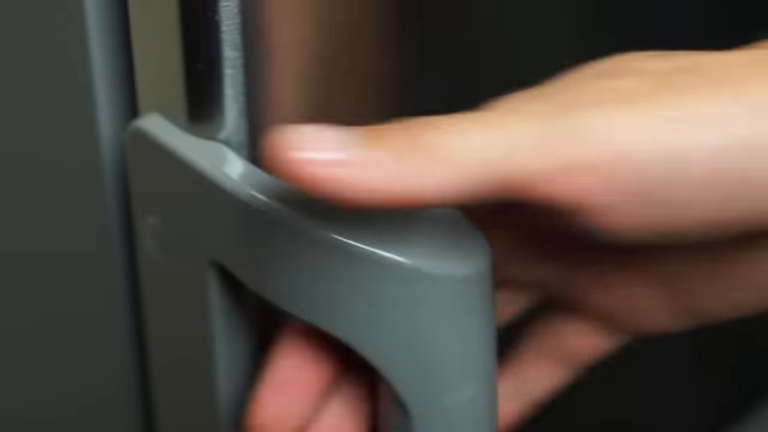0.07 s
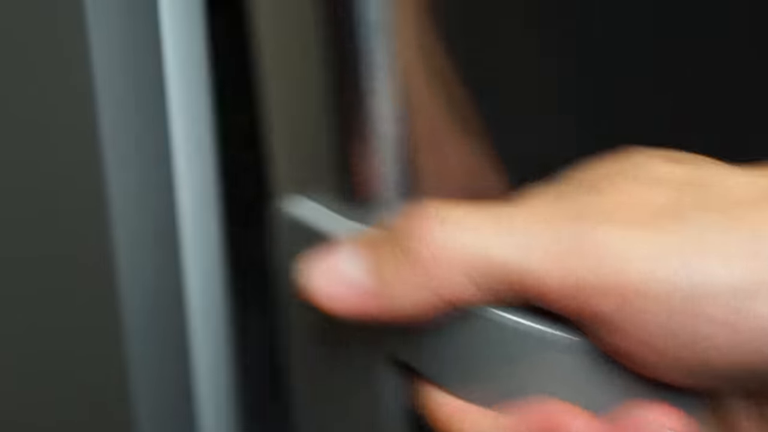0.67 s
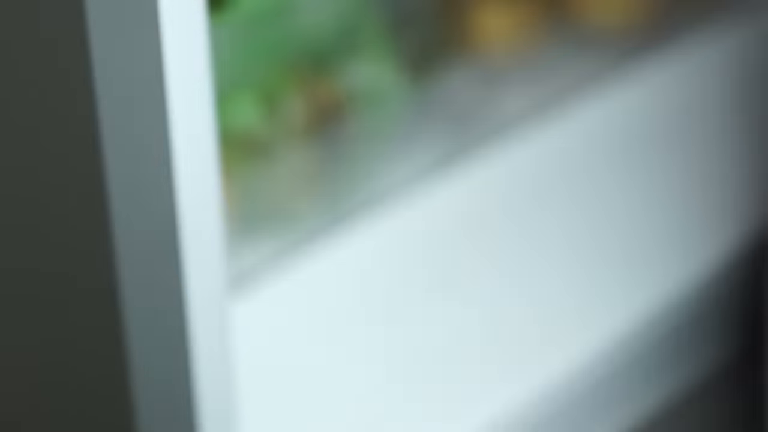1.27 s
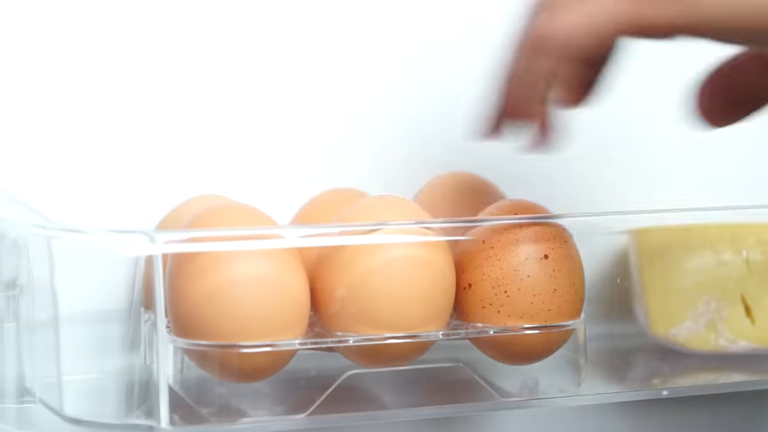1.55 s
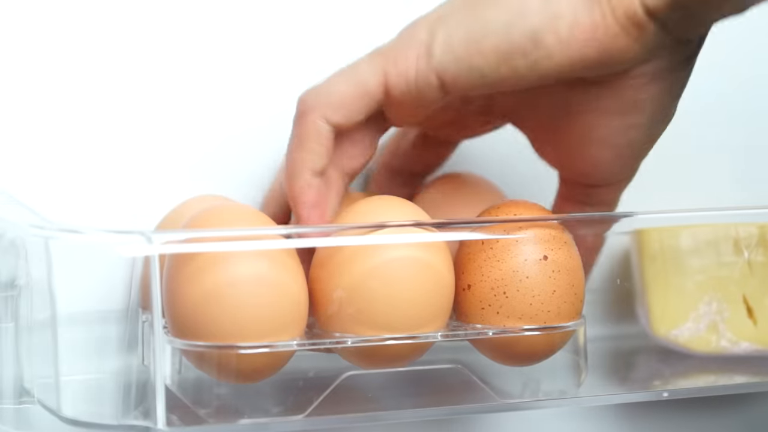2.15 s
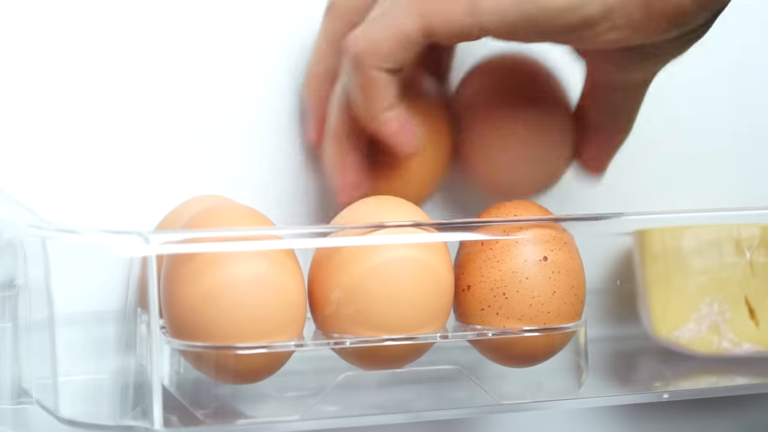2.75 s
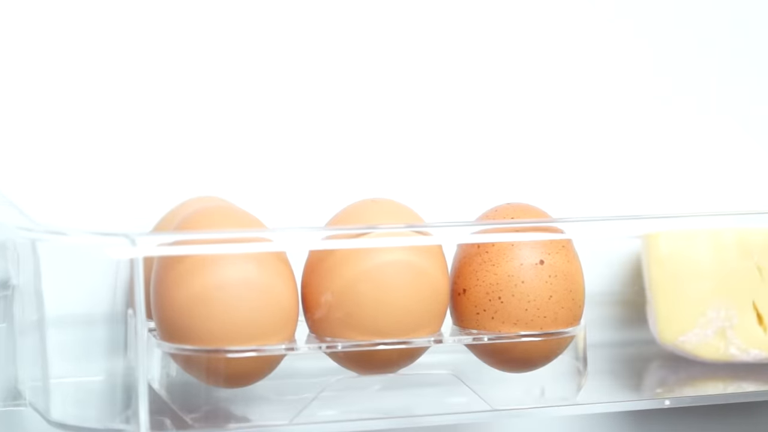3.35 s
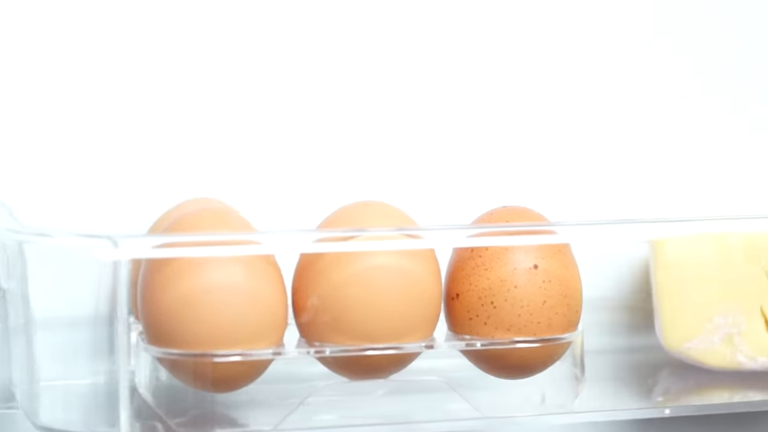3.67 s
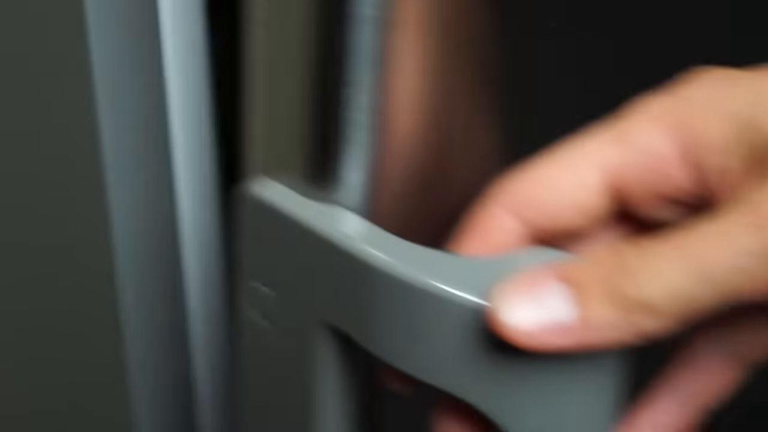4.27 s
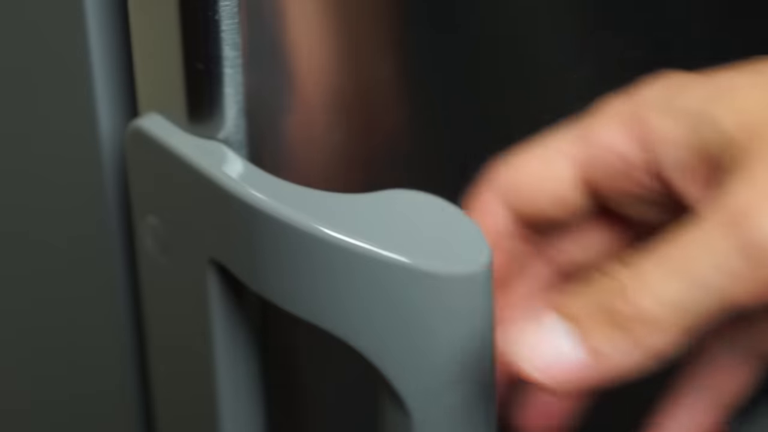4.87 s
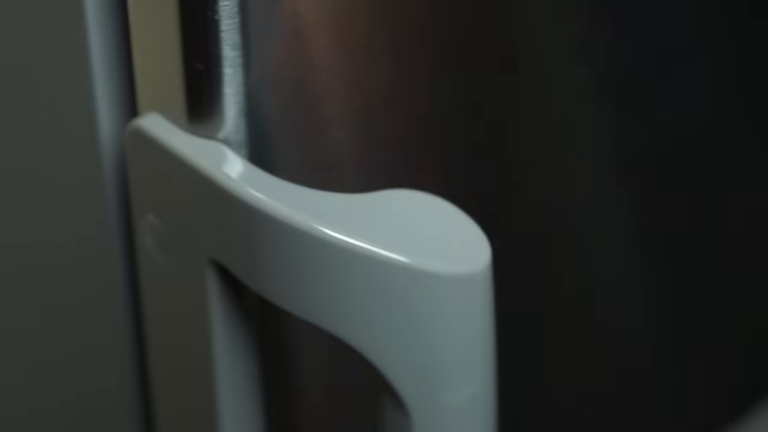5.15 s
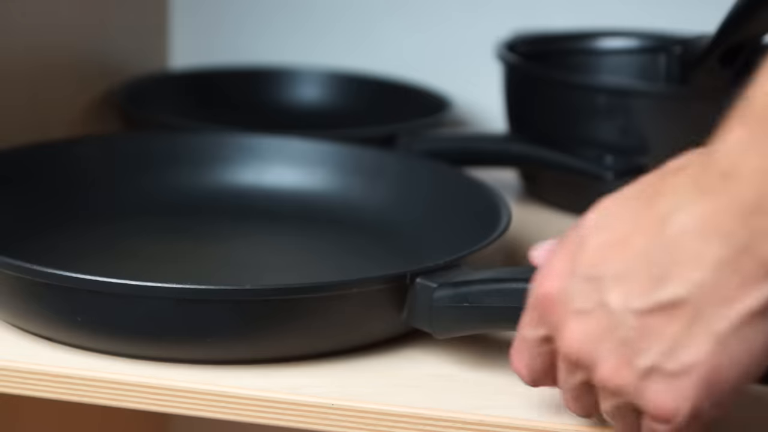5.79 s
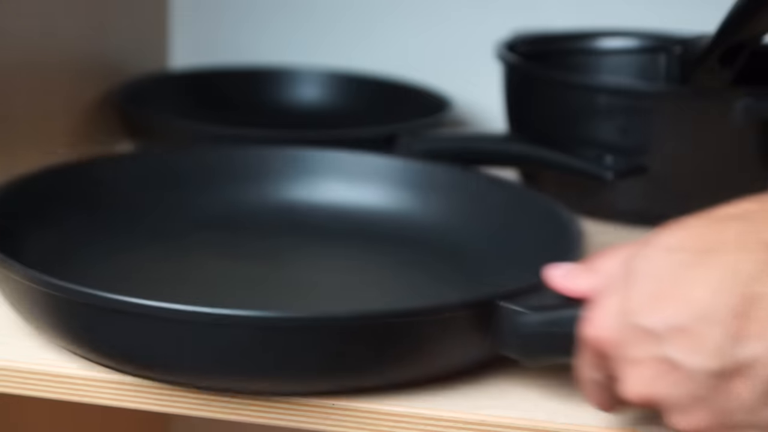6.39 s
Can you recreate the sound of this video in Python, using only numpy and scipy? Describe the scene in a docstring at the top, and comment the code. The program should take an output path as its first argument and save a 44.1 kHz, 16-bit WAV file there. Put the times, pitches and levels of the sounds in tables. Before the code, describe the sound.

Low room tone fills a slightly echoing kitchen, with the action close to the microphone. At about 0.5 seconds a fridge door is pulled open: the rubber seal rubs and snaps free in quick clicks, bottles touch lightly, and the door knocks at 0.8 seconds. From 1.4 to 3.9 seconds the open fridge whirrs faintly. Between 2.3 and 2.6 seconds eggs bump, slide and clink out of their hollow plastic cups, and a nudged glass rings on briefly. At 4.2 seconds the door rack clacks and the seal brushes; the door smacks shut near 4.5 seconds, followed by soft bumps until 5. Two soft taps on a pan handle come at 6.1 seconds, then the frying pan scrapes over a wooden shelf, growing louder and brighter until about 6.4. A faint hiss rises with each action, and the room tone dips briefly between them.

```python
"""A live kitchen, the microphone close to the fridge. The door is pulled open: its rubber seal rubs and
snaps free, bottles touch and the door knocks. The open fridge whirrs while eggs slide out of their cups,
clinking, and a nudged glass rings on. The door swings shut with a clack, a smack and soft bumps. Last,
a frying pan is dragged over a wooden shelf, its base catching on the grain. Each action comes up with
a faint hiss, over a room tone that dips briefly between them."""
import sys
import numpy as np
from scipy import signal
from scipy.fft import rfft, irfft, next_fast_len
from scipy.io import wavfile
from scipy.ndimage import uniform_filter1d

SR = 44100
rng = np.random.default_rng(int(sys.argv[2]) if len(sys.argv) > 2 else 0)


def wav_record(signal):
    """Record a signal, one row per channel, as 16-bit PCM in the file named by sys.argv[1]."""
    frames = np.transpose(np.atleast_2d(signal))
    bounded = np.clip(frames, -1, 1)
    # unit amplitude maps onto the largest positive 16-bit level
    quanta = np.round(bounded * 32767).astype(np.int16)
    wavfile.write(sys.argv[1], SR, quanta)


N = 283112
T = np.arange(N) / SR

# stretches of room tone: start_s, end_s, level_db
TONE_SPANS = [(0, 1.381, -59.5), (1.379, 3.903, -65), (3.898, 5.42, -64), (5.42, 6.6, -67)]
# spectra of the room tone, the hiss and the open fridge: frequency_hz, level_db
TONE_COLOUR = [(15, -35), (25, -9.5), (122, -12.5), (193, -3), (267, -9), (340, -6.5), (410, -8),
               (552, -5.5), (631, -11.5), (762, -3.5), (895, -12.5), (1080, -13.5), (1900, -17),
               (2230, -18), (15500, -28)]
HISS_COLOUR = [(18, -41), (30, -9), (111, -10.5), (187, 4.5), (256, -7.5), (389, -7), (532, -4),
               (622, -4.5), (767, -2), (1400, -16), (2360, -15.5), (15500, -27.5)]
WHIRR_COLOUR = [(15, -41), (25, -10.5), (96, -2.5), (193, -4), (221, -6), (289, -1.5), (359, -8.5),
                (389, 2), (457, -6), (762, -5), (997, -11.5), (1080, -10.5), (1750, -14), (5580, -20),
                (15500, -25.5)]
# stereo width of the room tone and of the close sounds: frequency_hz, side_over_mid_db
TONE_WIDTH = [(40, -16.5), (100, -10.5), (250, -2), (700, 2.5), (2500, 4), (6000, -1), (14000, -2)]
CLOSE_WIDTH = [(50, -27.5), (130, -21), (250, -11), (1000, -6.5), (3000, -4.5), (12000, -2.5)]
# fader moves, one for each action: start_s, fade_in_s, end_s, fade_out_s, hiss_db, floor_db
ACTIONS = [(0.328, .11, 1.141, 0.1, -43.5, -15), (2.19, .13, 2.738, .18, -42.5, -9),
           (4.074, 0.065, 4.99, .14, -47, -17.5), (6.029, 0.17, 6.49, .1, -52, -17.5)]

# seal and plastic trim snapping: start_s, level_db, tilt_db_per_octave, t60_s
SNAPS = [(0.4707, 3, -3.5, 0.047), (0.501, 4.5, 0, .057), (.527, 7, -1.5, .067), (0.5409, 19, 2.5, 0.024),
         (.551, 18, -4, .092), (.595, 14.5, -0.4, 0.033), (0.6, 15.5, -1.5, .07), (.668, 10, -1.6, .12),
         (.760, 1.5, 4.5, .09), (.763, 2, -8.5, 0.11), (2.398, 5.5, -1, .095), (2.545, 5.5, -1.5, .082),
         (4.2198, -1.5, 2, 0.044), (4.2233, 10.5, 2.5, 0.054), (4.358, -7, -5, .08),
         (4.453, -7.5, -4.5, 0.12), (4.4695, 18, -0.3, .05), (4.475, 19.5, 3.5, 0.015),
         (4.481, 18, -1, .08), (4.482, -6.5, 12.5, 0.054)]
# spectra of the snaps, the door panel behind them and the rubbing seal: frequency_hz, level_db
SNAP_COLOUR = [(200, 1.5), (1200, 0), (4500, -11.5), (13000, -28.5)]
PANEL_COLOUR = [(25, -20), (55, -12), (90, 0.5), (180, -2.5), (290, 5.5), (380, -2.5), (520, 5), (1050, -3),
                (1400, 2), (2200, 2), (5500, -0.5), (9500, -3.5), (15000, -2)]
RUB_COLOUR = [(24, -40.5), (40, -6.5), (119, -7), (153, -0.5), (364, -9), (443, -2.5), (643, -15),
              (765, -8), (1420, -12), (1920, -20.5), (4340, -31), (4680, -31), (15000, -41)]
# friction strokes: full_strength_at_s, hold_s, level_db
SEAL_RUBS = [(.485, 0.37, -34.5), (4.24, .19, -40.5), (4.5, 0.063, -38.5)]   # the seal peels off, brushes the frame and is pressed home
EGG_SLIDES = [(2.40, .015, -30), (2.48, 0.087, -37.5)]
# resonances of plastic trim, hollow egg cups and pan: pitch_hz, bandwidth_hz, level_db
TRIM_RESONANCES = [(1070, 20, -9), (1314, 30, -5), (1890, 35, -10.5), (6000, 830, -10)]
CUP_RESONANCES = [(126, 16, -6), (310, 53, -1.5), (437, 72, 3.5), (667, 92, 4.5), (1130, 91, -1),
                  (1780, 100, -20.5), (3323, 1700, -41)]
PAN_RESONANCES = [(855, 170, -5), (1390, 38, -5.5), (1700, 37, -0.5), (1910, 24, -2), (2390, 37, -8),
                  (2965, 22, -6), (3030, 48, -16.5), (3170, 20, -9), (3810, 28, -10), (4400, 39, -7),
                  (4900, 390, -15.5), (6000, 50, -18)]

# blows on each object: start_s, level_db, contact_cutoff_hz
BOTTLE_TOUCHES = [(.599, -1.5, 9000), (.669, -1, 12000), (.677, -4, 9000), (4.4755, 8.5, 3000)]
DOOR_KNOCKS = [(.8015, -0.5, 4560), (.8075, -8, 1470), (.928, -15.5, 613.5), (.972, -13.5, 390),
               (4.7497, -25, 5000), (4.750, -8, 481.5), (4.80, -18, 330.4), (4.868, -16, 430),
               (4.915, -20.5, 380), (4.94, -17, 303)]
CUP_BUMPS = [(2.3145, 1.5, 1800), (2.335, -5.5, 698), (2.358, -7, 1600), (2.402, -3.5, 1504)]
EGG_CLINKS = [(2.4115, -4, 12000), (2.4152, -4.5, 12000), (2.4212, 0.5, 10060), (2.428, 4, 3300),
              (2.4325, -8.5, 2892), (2.439, 1, 1985), (2.495, -12, 1770), (2.552, -12, 2040)]
GLASS_TOUCH = [(2.4155, -2.5, 12000)]
RACK_CLACKS = [(4.2502, -0.5, 3990), (4.2545, -8.5, 3010), (4.2605, -9, 3035)]
HANDLE_TAPS = [(6.108, -17, 900), (6.118, -23.5, 695)]
# ringing modes of each object: pitch_hz, level_db, t60_s
BOTTLE_MODES = [(1453, -32.5, 0.22), (1550, -29, 0.064), (3250, -38.5, 0.055), (3754, -35, 0.06),
                (4280, -34, 0.075)]
DOOR_MODES = [(156.4, -25.5, 0.2), (241, -17.5, 0.2), (274, -19.5, 0.22), (307, -24, 0.31),
              (377, -27.5, 0.3), (498, -7.5, 0.066), (664, -22.5, 0.13), (765, -17, 0.087),
              (838, -23, 0.028), (1060, -29, 0.046), (1298, -21.5, 0.068), (2190, -21.5, .028),
              (2466, -13, 0.032), (2670, -25.5, .028), (2870, -26, 0.022)]
CUP_MODES = [(115, -37, 0.26), (328.2, -28.5, .09), (415.3, -28, 0.091), (477, -30.5, 0.12),
             (670, -30, .05), (1158, -38, .05)]
EGG_MODES = [(691, -25.5, 0.095), (1068, -20.5, 0.096), (1140, -15.5, 0.03), (1325, -18, 0.071),
             (1910, -25.5, 0.043), (2286, -27.5, 0.036), (2630, -20, 0.038), (4020, -27.5, .04),
             (5380, -29.5, .035), (6400, -39.5, .03), (7710, -31.5, .03)]
GLASS_MODES = [(1272, -27, 0.98), (1315, -24, 0.5), (2622, -28.5, 0.34), (3890, -38, 0.39)]
RACK_MODES = [(718, -26.5, 0.073), (850, -22.5, 0.089), (1119, -27, 0.026), (1464, -18.5, 0.043),
              (1716, -21.5, 0.025), (2020, -24.5, 0.015)]
HANDLE_MODES = [(616, -41, 0.054), (903, -23, 0.065), (1180, -26, 0.041)]
# spectrum of the crack at each contact: frequency_hz, level_db
GLASS_CRACK = [(200, -20), (2000, -5.5), (9000, -12), (15000, -24)]
DOOR_CRACK = [(60, 4), (250, 31), (700, 29), (1300, 19), (1800, 11.5), (2600, 21.5), (3600, 5.5), (6000, 4),
              (15000, -12)]
CUP_CRACK = [(30, -22.5), (110, 2), (220, -4.5), (450, 7.5), (1500, -0.5), (3000, -7.5), (15000, -20.5)]
EGG_CRACK = [(30, -20), (110, 3), (400, 6), (1100, 12.5), (2200, 3), (4500, 0), (9000, -3.5), (15000, -11)]
RACK_CRACK = [(100, 7), (200, 20), (400, -3.5), (900, 16.5), (1800, 13.5), (3000, -3), (8000, -17.5),
              (15000, -32)]
HANDLE_CRACK = [(100, 9.5), (900, 17.5), (1600, 15), (4000, -11), (15000, -18)]

# the pan's drag, gathering speed: time_s, level_db
PAN_DRAG = [(6.2, -66), (6.228, -59.5), (6.298, -37.5), (6.37, -33.5), (6.412, -33), (6.42, -31.5)]
# spectrum of the wooden shelf: frequency_hz, level_db
SHELF_COLOUR = [(24, -80.5), (40, -36), (174, -5), (535, -13.5), (817, -6.5), (1080, -5), (1190, 2.5),
                (1520, -8), (1770, -4), (2330, -10), (2990, -8), (10900, -31), (13700, -35.5),
                (15500, -49.5)]
# echo of the kitchen: frequency_hz, t60_s, level_db
KITCHEN_ECHO = [(60, 0.6, -11), (248, 1.5, -1.5), (620, 0.58, -6), (1390, 1.1, -6), (3000, 0.43, -6.5),
                (7000, 0.4, -11.5), (15000, 0.25, -7)]


def from_db(db):
    """Decibels to gain."""
    return 10 ** (np.asarray(db) / 20)


def rms_one(x):
    """Scale to unit rms."""
    return x / np.sqrt(np.mean(x ** 2) + 1e-20)


def at_hz(table, hz, column=1):
    """Read a column of a table on a log-frequency axis."""
    table = np.array(table)
    return np.interp(np.log(hz + 1), np.log(table[:, 0]), table[:, column])


def colour(x, *spectra):
    """Causal (minimum-phase) filter with the summed dB of the spectra."""
    size = 2 * next_fast_len(x.shape[-1] // 2 + 2 ** 11, True)
    hz = np.fft.rfftfreq(size, 1 / SR)
    gain = from_db(sum(at_hz(spectrum, hz) for spectrum in spectra))
    cepstrum = irfft(np.log(gain))
    cepstrum[1:size // 2] *= 2
    cepstrum[size // 2 + 1:] = 0
    return irfft(rfft(x, size) * np.exp(rfft(cepstrum)))[..., :x.shape[-1]]


def resonate(x, resonances):
    """Ring a set of resonances in parallel."""
    return sum(from_db(db) * signal.lfilter(*signal.iirpeak(hz, hz / width_hz, fs=SR), x)
               for hz, width_hz, db in resonances)


def spread(mid_side, width=CLOSE_WIDTH):
    """Mid and side to left and right; the treble is wider than the bass."""
    mid, side = mid_side[0], colour(mid_side[1], width)
    return np.array([mid + side, mid - side])


def add(out, start_s, sound):
    """Mix a sound in at its start time."""
    start = round(start_s * SR)
    out[:, start:start + sound.shape[1]] += sound[:, :N - start]


def fade(start_s, in_s, end_s, out_s):
    """Straight fade in, hold, straight fade out."""
    return np.clip(np.minimum((T - start_s) / in_s, (end_s - T) / out_s), 0, 1)


def air(spectrum, width):
    """Smooth background noise with unit rms in the middle."""
    noise = colour(spread(rng.standard_normal((2, N)), width), spectrum)
    return noise / noise.mean(axis=0).std()


def crack(t60_s, click, swell):
    """A contact click and the crowd of short-lived panel modes that swells behind it."""
    age = T[:2 ** 13]
    envelope = from_db(-60 * age / t60_s) * (1 - np.exp(-age / (swell * t60_s)))
    burst = rng.standard_normal((2, len(age))) * envelope
    burst /= np.sqrt(np.sum(burst[0] ** 2))
    burst[0, 0] += click
    spectrum = rfft(burst)
    # the modes share the energy evenly over the frequency range
    spectrum /= np.sqrt(uniform_filter1d(abs(spectrum) ** 2, size=25, axis=1))
    return spread(irfft(spectrum) * (age < t60_s))


def struck(blows, modes, crack_colour, crack_t60_s, vary_db=1.2, mode_width=0.22):
    """Each blow rings the modes with new strengths; a soft contact takes the treble away."""
    out, age = np.zeros((2, N)), T[:SR // 2]
    pitch_hz, mode_db, t60_s = np.transpose(modes)
    rings = np.sin(2 * np.pi * np.outer(pitch_hz, age)) * from_db(-60 * np.outer(1 / t60_s, age))
    signs = (-1) ** np.arange(len(pitch_hz))
    for start_s, blow_db, cutoff_hz in blows:
        level_draw, side_draw = rng.standard_normal((2, len(pitch_hz)))
        strength = signs * from_db(mode_db + vary_db * level_draw)
        balance = 1 + mode_width * side_draw * [[1], [-1]]
        sound = (strength * balance) @ rings
        add(sound, 0, colour(crack(crack_t60_s, click=0.088, swell=0.016), crack_colour))
        contact = signal.butter(2, cutoff_hz, fs=SR)
        add(out, start_s, from_db(blow_db) * signal.lfilter(*contact, sound))
    return out


def slips(per_s, uneven_db):
    """Friction: a dense train of tiny slips of uneven size."""
    sizes = from_db(uneven_db * np.minimum(rng.exponential(1, N), 4))
    return spread(rng.standard_normal((2, N)) * sizes * (rng.random(N) < per_s / SR))


def strokes(rows, rise_db_per_s, fall_db_per_s):
    """Each stroke swells, holds and dies away; the strongest one sets the gain."""
    levels_db = [db - rise_db_per_s * np.maximum(full_s - T, 0)
                 - fall_db_per_s * np.maximum(T - full_s - hold_s, 0) for full_s, hold_s, db in rows]
    return from_db(np.max(levels_db, axis=0))


def tone_fade(start_s, end_s):
    """A stretch of background comes in quickly and leaves more gently."""
    return fade(start_s, 0.006, end_s, 0.12)


def room_tone():
    """The air of the kitchen, wide and low, dipping briefly before each new level."""
    level = sum(tone_fade(start_s, end_s) * from_db(db) for start_s, end_s, db in TONE_SPANS)
    return level * air(TONE_COLOUR, TONE_WIDTH)


def action_hiss():
    """A faint hiss comes and goes with each action."""
    level = sum(fade(*timing) * from_db(db) for *timing, db, _ in ACTIONS)
    return level * air(HISS_COLOUR, CLOSE_WIDTH)


def seal_snaps(pivot_hz=1240):
    """Seal and trim let go, each snap with its own brightness, and sound through the door panel."""
    out = np.zeros((2, N))
    for start_s, snap_db, tilt, t60_s in SNAPS:
        click = 0.0048 / t60_s   # the quicker the snap, the stronger its first click
        tilted = [(hz, db + snap_db + tilt * np.log2(hz / pivot_hz)) for hz, db in SNAP_COLOUR]
        add(out, start_s, colour(crack(t60_s, click, swell=0.037), PANEL_COLOUR, tilted))
    return from_db(-2) * (out + resonate(out, TRIM_RESONANCES))


def seal_rub():
    """The rubber seal slips as the door opens and closes."""
    rubber = rms_one(colour(slips(per_s=1000, uneven_db=1), RUB_COLOUR))
    return rubber * strokes(SEAL_RUBS, rise_db_per_s=900, fall_db_per_s=55)


def bottle_jingles():
    """Bottles touch in the door rack and ring briefly."""
    return struck(BOTTLE_TOUCHES, BOTTLE_MODES, GLASS_CRACK, crack_t60_s=0.028)


def door_knocks(bounce_s=0.016, loss_db=10, cutoff_share=0.31):
    """The door body is knocked and bounces once each time, weaker and duller."""
    bounces = [(start_s + bounce_s, db - loss_db, hz * cutoff_share) for start_s, db, hz in DOOR_KNOCKS]
    return struck(list(DOOR_KNOCKS) + bounces, DOOR_MODES, DOOR_CRACK, crack_t60_s=0.084)


def fridge_whirr(peak_s=2.5, peak_db=-49, fall_db_per_s=10):
    """The open fridge whirrs through the second stretch of room tone, loudest near the middle."""
    start_s, end_s, _ = TONE_SPANS[1]
    swell = from_db(peak_db - fall_db_per_s * abs(T - peak_s))
    return tone_fade(start_s, end_s) * swell * air(WHIRR_COLOUR, TONE_WIDTH)


def cup_bumps():
    """Fingers and eggs bump the hollow cups."""
    return struck(CUP_BUMPS, CUP_MODES, CUP_CRACK, crack_t60_s=0.05)


def egg_slides():
    """Shells slip out of their cups and the hollows resonate."""
    shells = rms_one(resonate(slips(per_s=1300, uneven_db=-2.5), CUP_RESONANCES))
    return shells * strokes(EGG_SLIDES, rise_db_per_s=160, fall_db_per_s=401.5)


def egg_clinks():
    """Eggs clink in the door rack; shells and rack both ring."""
    return struck(EGG_CLINKS, EGG_MODES, EGG_CRACK, crack_t60_s=0.034)


def glass_ring():
    """A glass in the rack is nudged and rings on."""
    return struck(GLASS_TOUCH, GLASS_MODES, GLASS_CRACK, crack_t60_s=0.019)


def rack_clacks():
    """The rack clacks as the door swings."""
    return struck(RACK_CLACKS, RACK_MODES, RACK_CRACK, crack_t60_s=0.045)


def handle_taps():
    """A hand takes the pan handle with two soft taps."""
    return struck(HANDLE_TAPS, HANDLE_MODES, HANDLE_CRACK, crack_t60_s=0.057)


def pan_scrape(metal_db=-2, wood_db=-1.5, dull_hz=2602, brightening=1.1):
    """The base of the pan catches on the wood grain; shelf and metal both sound, brighter with speed."""
    drag = from_db(np.interp(T, *np.transpose(PAN_DRAG), left=-120))
    speed = drag / drag.max()
    grains = slips(per_s=6000, uneven_db=-0.5)
    dull = signal.lfilter(*signal.butter(2, dull_hz, fs=SR), grains)
    bright = signal.lfilter(*signal.butter(2, dull_hz, "high", fs=SR), grains)
    friction = dull - speed ** brightening * bright
    metal, wood = resonate(friction, PAN_RESONANCES), colour(friction, SHELF_COLOUR)
    sliding = speed > 0.1
    return drag * sum(from_db(db) * part / part[:, sliding].std()
                      for db, part in [(metal_db, metal), (wood_db, wood)])


def kitchen_echo(x, build_s=0.0089):
    """Diffuse echo that builds up quickly and dies octave by octave."""
    age, response = T[:2 * SR], 0
    for hz in np.geomspace(60, 14000, 9):
        octave = signal.butter(2, [hz / np.sqrt(2), hz * np.sqrt(2)], "band", fs=SR, output="sos")
        tail = signal.sosfilt(octave, rng.standard_normal((2, len(age))))
        tail *= from_db(-60 * age / at_hz(KITCHEN_ECHO, hz)) * (1 - np.exp(-age / build_s))
        band_share = np.sqrt(2) * hz / SR
        gain = from_db(at_hz(KITCHEN_ECHO, hz, column=2)) * np.sqrt(band_share / len(age))
        response = response + gain * rms_one(tail)
    return signal.fftconvolve(x.mean(axis=0)[None], spread(response), axes=1)[:, :N]


def door_shade(x):
    """The body of the door shades the right side; the left is a little louder and brighter."""
    left = colour(x[0], [(150, 0.31), (2500, 1.2)])   # frequency_hz, level_db
    right = colour(x[1], [(150, -0.65), (2500, -0.68)])
    return np.array([left, right])


def fader():
    """Gain of the close sounds and their echo: full during an action, low between actions."""
    *_, end_s, _, _, floor_db = np.transpose(ACTIONS)
    raised = sum(fade(*timing) for *timing, _, _ in ACTIONS)
    return np.maximum(raised, from_db(np.interp(T, end_s, floor_db)))


def scene():
    """Fridge and pan close to the microphone, each sound with its own share of kitchen echo."""
    door = door_knocks()
    rack = rack_clacks() + bottle_jingles()
    eggs = egg_clinks() + cup_bumps() + glass_ring()
    pan = handle_taps() + pan_scrape()
    snaps = seal_snaps()
    rubbing = seal_rub() + egg_slides()
    into_room = snaps + pan + from_db(-4.5) * door + from_db(-6) * rack + from_db(-1.5) * (eggs + rubbing)
    close = door_shade(snaps + rack + eggs) + door + rubbing + pan
    return fader() * (close + kitchen_echo(into_room)) + room_tone() + fridge_whirr() + action_hiss()


def record(dry, rumble_hz=26, top_hz=15900):
    """Rumble is cut, the highest peaks are rounded, the top is cut steeply."""
    lean = signal.sosfilt(signal.butter(2, rumble_hz, "high", fs=SR, output="sos"), dry)
    rounded = np.tanh(lean)
    return signal.sosfilt(signal.ellip(10, 0.2, 70, top_hz, fs=SR, output="sos"), rounded)


dry = scene()
out = record(dry)
wav_record(out)
```